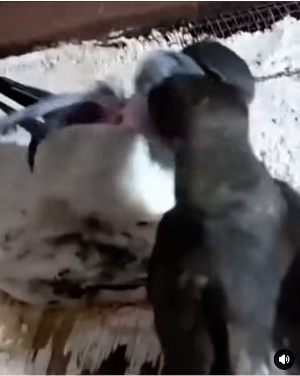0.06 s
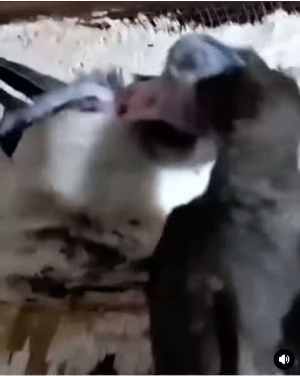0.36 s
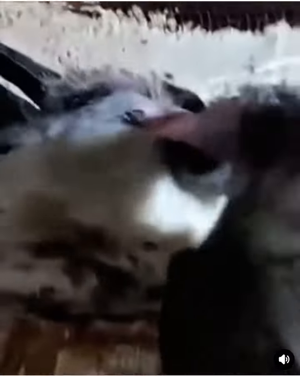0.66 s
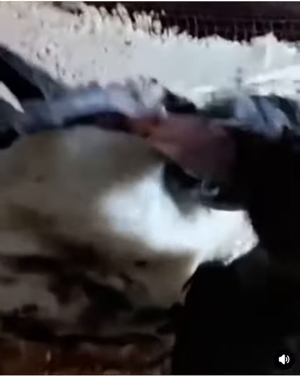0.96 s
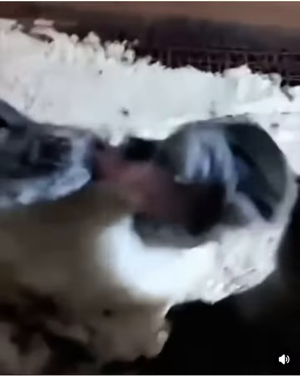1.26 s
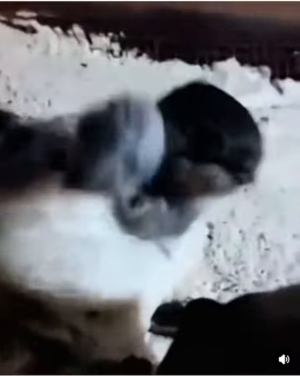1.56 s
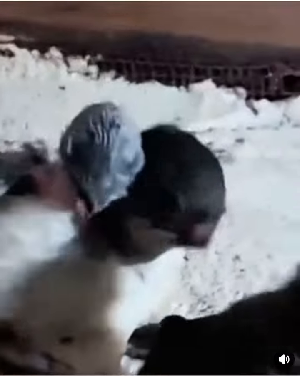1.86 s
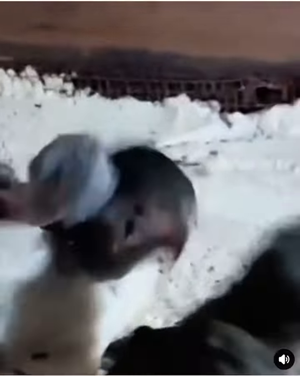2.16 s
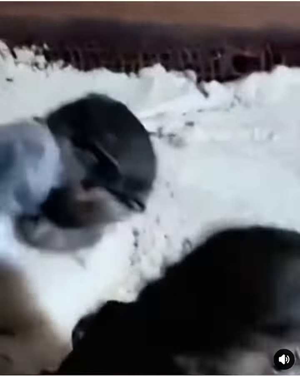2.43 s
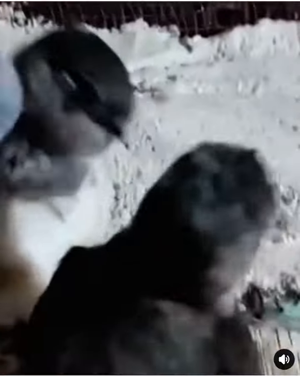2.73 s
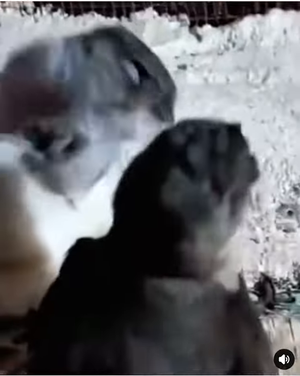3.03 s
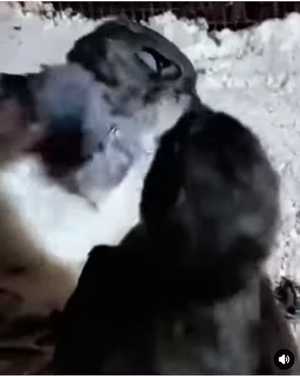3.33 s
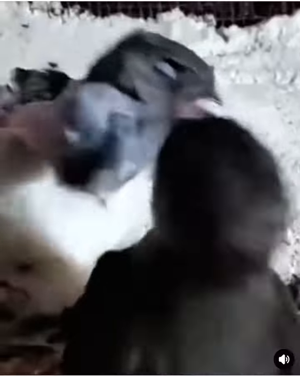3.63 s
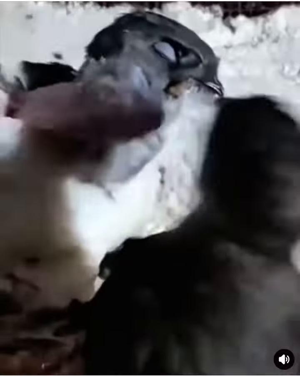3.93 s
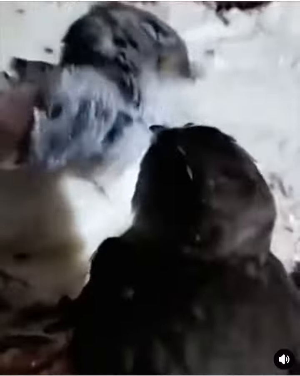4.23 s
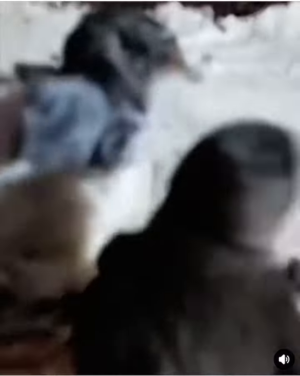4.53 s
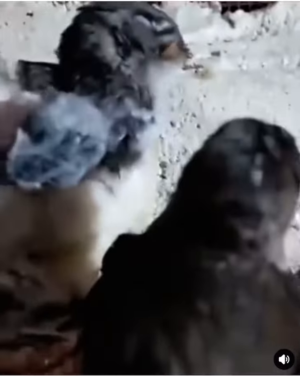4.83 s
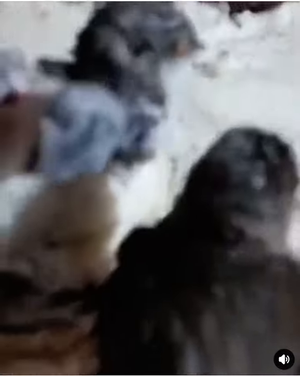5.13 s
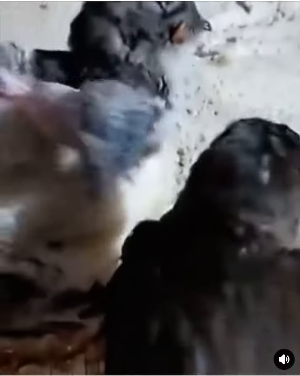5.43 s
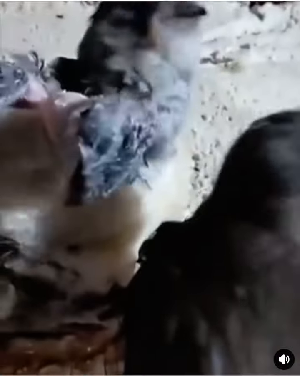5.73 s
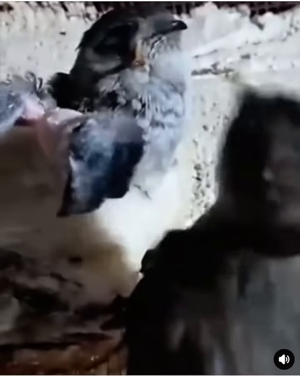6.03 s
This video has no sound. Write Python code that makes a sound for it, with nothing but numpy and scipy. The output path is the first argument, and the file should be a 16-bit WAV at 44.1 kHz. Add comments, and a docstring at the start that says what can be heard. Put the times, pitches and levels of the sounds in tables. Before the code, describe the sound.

Swiftlets click and twitter in a closed bird house while a nearby chick gives piercing begging calls, followed by squeaks and rattling trills.

```python
"""A swiftlet chick begs in a row of shrill, quavering calls, then breaks into squeaks and rattling trills.
Its voice comes from the syrinx, a bird's voice box, and is shrill and ringing.
Flying birds click to find their way by echo, and the colony twitters over a low rumble and hiss.
The closed bird house echoes, and the chick is so near a small microphone that it overloads it."""
import sys
import numpy as np
from scipy import signal
from scipy.fft import rfft, irfft
from scipy.io import wavfile

SR = 44100
rng = np.random.default_rng(int(sys.argv[2]) if len(sys.argv) > 2 else 0)


def digitize_waveform(pressure):
    """Quantize a signal to 16-bit integers and store it at the path in sys.argv[1].

    Rows of a 2-D input are taken as channels; values are limited to [-1, 1].
    """
    field = np.atleast_2d(pressure).T
    bounded = np.clip(field, -1, 1)
    quanta = np.round(bounded * 32767).astype(np.int16)
    wavfile.write(sys.argv[1], SR, quanta)


N = 276948
TREBLE_LIMIT_HZ = 15600


def amp(db):
    """Turns decibels into a factor to multiply by."""
    return 10 ** (np.asarray(db) / 20)


def unit(x):
    """Scales a signal to an average (rms) level of 1."""
    return x / np.sqrt(np.mean(x ** 2) + 1e-20)


def add(mix, start_s, sound):
    """Mixes a sound in at a given time."""
    part = mix[max(round(start_s * SR), 0):][:len(sound)]
    part += sound[:len(part)]


def shaped(x, tone):
    """Filters a signal with a tone curve of (f/Hz, level/dB) points."""
    hz, db = np.transpose(tone)
    bins_hz = np.fft.rfftfreq(len(x), 1 / SR)
    gain = amp(np.interp(np.log(bins_hz + 1), np.log(hz), db))
    return irfft(rfft(x) * gain, len(x))


def wander(size, hz):
    """A smooth random wobble, mostly slower than hz."""
    f = np.fft.rfftfreq(16384, 1 / SR)
    spectrum = rfft(rng.standard_normal(16384))
    return unit(irfft(spectrum / (1 + (f / hz) ** 4)))[:size]


def fade(t, rise_s, fall_s):
    """Fades a note in and out."""
    return np.clip(t / rise_s, 0, 1) * np.clip((t[-1] - t) / fall_s, 0, 1)


def reverb(x, ring_s):
    """A blur of echoes that dies away by 60 dB in ring_s."""
    t = np.arange(SR) / SR
    echoes = rng.standard_normal(SR) * amp(-60 * t / ring_s) * np.clip(t / 0.00025, 0, 1)
    return signal.fftconvolve(x, echoes / np.linalg.norm(echoes))[:N]


# Tone of the rumble and hiss: f/Hz, level/dB
NOISE_TONE = [(20, 7), (70, 10.5), (130, 13.5), (180, 10), (280, 7.5), (550, 2.5), (1100, 1), (3000, -1),
              (13600, 1), (14100, -40)]
# Hum of the power supply: f/Hz, level/dB
HUM = [(48.4, -50.5)]


def background(noise_db=-46):
    """Steady low rumble, hiss and a faint electric hum."""
    t = np.arange(N) / SR
    hum = sum(amp(db) * np.sqrt(2) * np.sin(2 * np.pi * hz * t) for hz, db in HUM)
    return amp(noise_db) * unit(shaped(rng.standard_normal(N), NOISE_TONE)) + hum


def chip(top_hz, end_hz, length_s, overtone_db=-8, droop_db=-3, jitter=0.051):
    """A tiny hoarse whistle that holds a high pitch, drops and holds again."""
    t = np.arange(0, length_s, 1 / SR)
    progress = t / length_s
    drop = np.clip((progress - .15) / .65, 0, 1)
    glide_hz = end_hz * (top_hz / end_hz) ** (np.cos(np.pi * drop / 2) ** 2)
    hz = glide_hz * (1 + jitter * wander(len(t), 1620))
    phase = 2 * np.pi * np.cumsum(hz) / SR
    whistle = np.sin(phase) + amp(overtone_db) * np.sin(2 * phase)
    return fade(t, .0004, .0008) * amp(droop_db * progress) * whistle


# Tone of the far birds: f/Hz, level/dB
TWITTER_TONE = [(1200, -25), (1700, 3), (2900, 0), (3400, 10.5), (4000, 11), (4600, 4), (5400, 13),
                (6300, 5), (7600, -4.5), (9000, -16), (15000, -45)]
# How the twitter swells and brightens: t/s, level/dB, treble tilt/dB per octave
TWITTER_SWELL = [(0, -33, 5.5), (.65, -34.5, 6.5), (.9, -37.5, 9.5), (2.2, -40, 9), (3.7, -36, 5),
                 (5.4, -36, 2.5), (6.04, -39.5, 4.5), (6.28, -28.5, 8.5)]


def colony(count=440, chip_s=0.00433, chips_db=-6):
    """Far birds chip at random; a wash of noise stands for the many calls that the room blurs."""
    chips = np.zeros(N)
    for when, pitch, size in rng.random((count, 3)):
        sound = chip(4500 + 3500 * pitch, 3200 + 1500 * pitch, chip_s)
        add(chips, when * N / SR, amp(9.3 * size) * sound)
    wash = unit(shaped(rng.standard_normal(N), TWITTER_TONE))
    chips = unit(shaped(chips + reverb(chips, 0.12), TWITTER_TONE))
    hz, t, spectra = signal.stft(unit(wash + amp(chips_db) * chips), SR, nperseg=512)
    times, db, tilt = np.transpose(TWITTER_SWELL)
    octaves = np.log2((hz[:, None] + 100) / 4700)
    gain = amp(np.interp(t, times, db) + np.interp(t, times, tilt) * octaves)
    return signal.istft(spectra * gain, SR, nperseg=512)[1][:N]


# Clicks of flying birds: t/s, relative level/dB, f/Hz, strength of a click just before/0-1
ECHO_CLICKS = [(0.0266, -21.5, 3320, 0.4), (.1398, -18, 3320, 0.5), (0.1756, -20.5, 5500, 0.2),
               (0.2207, -23.5, 4200, 0), (.247, -26, 5740, 0), (0.318, -17, 3670, 0.75),
               (.388, -18, 3530, 0.65), (0.4685, -17.5, 3660, 0.15), (.559, -16.5, 3620, 0.16),
               (0.5748, -23.5, 5500, 0.7), (.637, -22.5, 5900, 0.66), (0.6517, -22.5, 5000, 0.2),
               (0.7366, -18, 3760, 0.27), (.8001, -25.5, 4960, 0), (4.9094, -23, 4560, 0),
               (6.147, -25.5, 3550, 0.2), (6.248, -19, 4870, 0)]


def echo_clicks(gain_db=5.0, ring_db=-16, pair_gap_s=.0152):
    """Each click is a snap in the throat with a weaker low ring; many come as a weak-strong pair."""
    out = np.zeros(N)
    t = np.arange(0, .012, 1 / SR)
    swell = t / .0005 * np.exp(1 - t / .0005)
    ring = amp(ring_db) * np.exp(-t / .002) * np.sin(2 * np.pi * 1800 * t)
    for start, db, hz, lead in ECHO_CLICKS:
        falling_hz = hz * (1 + 1.86 * np.exp(-t / 0.00018))
        snap = swell * np.sin(2 * np.pi * np.cumsum(falling_hz) / SR)
        click = amp(db + gain_db) * (snap + ring)
        add(out, start - pair_gap_s, lead * click)
        add(out, start, click)
    return shaped(out, [(1000, -42), (1600, -2), (6500, 1.5), (9000, -12)])


# The voice's harmonics, at 1 to 5 times its pitch: level/dB
VOICE_HARMONICS = [-10, -8, -13.5, -11.5, -13]


def syrinx(hz, crack, rasp_db, overtone_db=0):
    """The voice box makes harmonics and a rasp of air; a crack adds tones halfway between harmonics."""
    phase = 2 * np.pi * np.cumsum(hz) / SR
    out = amp(rasp_db + overtone_db) * wander(len(hz), 2770) * np.sin(2 * phase)
    for k, db in enumerate(VOICE_HARMONICS, 1):
        level = amp(db + overtone_db * (k > 1))
        for multiple, share in ((k, 1), (k - .5, crack)):
            out += share * level * (multiple * hz < TREBLE_LIMIT_HZ) * np.sin(multiple * phase)
    return out


def shiver_phase(t, hz, unevenness):
    """Where the voice box is in its fast, slightly uneven shiver."""
    rate_hz = hz * (1 + unevenness * wander(len(t), 58.5))
    return 2 * np.pi * (rng.random() + np.cumsum(rate_hz) / SR)


# Squeaks: t/s, length/s, first f/Hz, last f/Hz, relative peak level/dB, place of the peak/0-1,
# level at the farther end/dB from the peak, flutter/0-1, overtone boost/dB
SQUEAK_NOTES = [(0.813, 0.022, 1904, 2860, -0.5, 0.76, -23, 0.26, -1),
                (3.286, 0.063, 2916, 2000, -9, 0.2, -19, 0.56, 0),
                (3.36, 0.041, 1984, 3730, -6.5, .95, -14, 0.86, 0.5),
                (4.106, 0.022, 3268, 1640, -0.5, 0.14, -11, 0.15, -22),
                (4.3182, .049, 3680, 1410, 1, .05, -19.5, 0.44, 1),
                (4.375, 0.04, 1886, 2160, -7, 0.9, -5.5, 0.1, -1),
                (4.416, .06, 2413, 3100, -4.5, 0.27, -9, 0.33, 2),
                (4.637, 0.016, 3056, 2030, 0, 0, -15, 0.11, -1),
                (4.882, 0.07, 5730, 5790, -20, 0.77, -15.5, 0.09, -20),
                (5.832, 0.022, 2692, 1770, -5, 0.38, -13, 0.7, -2.5),
                (6.205, .045, 2580, 2700, -35, .4, -14, 0.26, 4),
                (6.27, 0.01, 1820, 2100, -9, 0.25, -11.5, 0.42, -5)]
# Tone of the squeaks as heard: f/Hz, level/dB
SQUEAK_TONE = [(1200, -11), (1750, -9.5), (2400, -6), (2950, -7.5), (3350, -6.5), (3900, -5), (4500, -6.5),
               (5100, -2.5), (5800, -1), (6500, -8), (7400, -3), (8300, -17.5), (9500, -20.5), (14000, -32)]


def squeaks(depth=0.21, jitter=0.081, throb_db=5, gain_db=-2, rasp_db=-16, shimmer_db=3):
    """Notes that glide up or down and swell to one peak, clean or broken by a flutter."""
    out = np.zeros(N)
    for start, length, first_hz, last_hz, db, peak, fall_db, flutter, overtone_db in SQUEAK_NOTES:
        t = np.arange(0, length, 1 / SR)
        progress = t / length
        shiver = shiver_phase(t, hz=166.5, unevenness=0.144)
        wobble = depth * np.sin(shiver) + jitter * wander(len(t), 1220)
        hz = first_hz * (last_hz / first_hz) ** progress * (1 + flutter * wobble)
        swell_db = fall_db * abs(progress - peak) / max(peak, 1 - peak)
        flicker_db = throb_db * flutter * np.cos(shiver) + shimmer_db * wander(len(t), 380)
        level = amp(gain_db + db + swell_db + flicker_db) * fade(t, 0.0013, 0.0014)
        add(out, start, level * syrinx(hz, 0.055 * flutter, rasp_db, overtone_db))
    return shaped(out, SQUEAK_TONE)


# Begging calls: t/s, length/s, dip f/Hz, final f/Hz, strain/0-1
BEGGING_CALLS = [(0.903, .057, 2840, 3180, 0.3), (1.046, 0.087, 2656, 3520, 0),
                 (1.238, .11, 2671, 3560, 0.37), (1.467, .12, 2658, 3520, 0.3),
                 (1.698, 0.12, 2765, 3434, 0.74), (1.96, 0.11, 2547, 3486, 0.43),
                 (2.191, 0.11, 2656, 3494, 0.3), (2.4193, .12, 2725, 3430, .7),
                 (2.672, 0.13, 2823, 3298, 1), (2.938, .14, 2864, 3346, 0.73),
                 (3.222, 0.062, 3218, 3128, 0.35)]
# Five stages of a call: share of its length/0-1
CALL_STAGES = [0, .27, .6, .8, 1]
# Swell at those stages: level/dB
CALL_SWELL = [0, -4, -2, 1.2, -1.3]
# An easy and a fully strained call: share of the climb made early/0-1
EARLY_CLIMB = (0.1184, .95)
# An easy and a fully strained call: level/dB
STRAIN_LEVEL = (-2.5, 0)
# Tone of the begging calls as heard: f/Hz, level/dB
BEGGING_TONE = [(1700, -4), (2100, -9.5), (2600, -2), (3000, -15.5), (3330, -3), (3900, -18), (4550, -15.5),
                (5100, 4.5), (5600, -5), (6300, 0.5), (7100, 3), (8200, -8.5), (10000, -19), (14000, -24)]


def begging(depth=0.063, jitter=0.023, throb_db=1.5, shimmer_db=2.5):
    """Quavering calls dip and mostly climb again; strain makes them louder, climb sooner and crack."""
    out = np.zeros(N)
    for start, length, dip_hz, final_hz, strain in BEGGING_CALLS:
        t = np.arange(0, length, 1 / SR)
        progress = t / length
        shiver = np.sin(shiver_phase(t, hz=178.6, unevenness=.06))
        looseness = np.interp(progress, CALL_STAGES, [0.34, 2.05, 1.36, 0.39, 0.49])
        climb_hz = dip_hz + (final_hz - dip_hz) * np.interp(strain, [0, 1], EARLY_CLIMB)
        hz = np.interp(progress, CALL_STAGES, [1.11 * dip_hz, dip_hz, climb_hz, final_hz, final_hz])
        hz *= 1 + looseness * (depth * shiver + jitter * wander(len(t), 1350))
        db = np.interp(strain, [0, 1], STRAIN_LEVEL) + np.interp(progress, CALL_STAGES, CALL_SWELL)
        flicker_db = throb_db * looseness * shiver + shimmer_db * wander(len(t), 230)
        # The voice cracks an octave down, mainly at the two ends of a call.
        first_crack = strain * np.exp(-((t - .012) / 0.013) ** 2)
        last_crack = 0.44 * np.exp(-((length - t) / 0.0044) ** 2)
        crack = first_crack + last_crack + 0.1 * wander(len(t), 890)
        level = amp(db + flicker_db) * fade(t, 0.0024, 0.001)
        add(out, start, level * syrinx(hz, crack, rasp_db=-14.0))
    return shaped(out, [(900, -114)] + BEGGING_TONE)


RATTLE = 66.2  # chips per second in the long, steady last trill
# Trills: t/s, length/s, first and last rate/chips per s, a chip's top and end f/Hz,
# relative level/dB, level change/dB, final sag of a chip's top and end/octaves
TRILL_RUNS = [(3.4441, 0.0454, 160, 140, 6910, 3590, 1, -4, 0.1, .08),
              (3.5185, 0.0103, 140, 130, 7500, 4180, -4, -5, 0.42, 0.37),
              (3.578, 0.016, 135, 127.9, 5100, 3650, -3.5, 4.5, 0.63, 0.29),
              (3.782, 0.02, 148, 165, 4170, 3135, 3.5, -5, 0.017, .02),
              (3.811, .059, 145, 130, 7210, 3310, 2.5, -9.5, 0.17, .1),
              (3.8913, .207, 111, 66, 7540, 3710, -4.5, 0.5, 1.4, 0.11),
              (4.5096, 0.12, 107, 72, 6890, 3470, -2.5, -7, 0.24, .12),
              (4.9598, 0.34, RATTLE, RATTLE, 7193, 3468, -1.5, -7.5, 1.82, 0.96)]
# Tone of the trills as heard: f/Hz, level/dB
TRILL_TONE = [(1200, -25), (1750, -15), (2400, -8.5), (2950, -11), (3350, -5), (3900, -14.5), (4500, -10),
              (5100, -6.5), (5800, -6), (6500, -4), (7500, -10.5), (8300, -14.5), (9300, -23.5),
              (14000, -25)]


def trills(rasp=0.49, gain_db=-0.07, sag_s=.048, sag_db_per_octave=-3):
    """Quick runs of chips whose pitch sags as the run ends; louder chips last longer."""
    out = np.zeros(N)
    for start, span, first, last, top_hz, end_hz, level_db, change_db, top_sag, end_sag in TRILL_RUNS:
        t = 0
        while t < span:
            rate = first + (last - first) * (t / span) ** 0.65  # changes fastest early on
            sag = np.expm1(t / sag_s) / np.expm1(span / sag_s)
            db = level_db + change_db * t / span + sag_db_per_octave * top_sag * sag
            stray_pitch, stray_db = rng.standard_normal(2)
            length = .52 / rate * np.clip(1.1 + .025 * db, .8, 1.2)  # about half chip, half gap
            low_hz = end_hz / 2 ** (end_sag * sag)
            high_hz = top_hz * (1 + .025 * stray_pitch) / 2 ** (top_sag * sag)
            sound = chip(max(high_hz, low_hz), low_hz, length)
            roughness = 1 + rasp * wander(len(sound), 1440)
            add(out, start + t, amp(gain_db + db + stray_db) * sound * roughness)
            t += 1 / rate
    return shaped(out, TRILL_TONE)


# Echoes off the wall and beam by the nest: delay/s, relative level/dB
WALL_ECHOES = [(.0011, -20), (.0027, -10), (.0046, -7.5), (.0071, -17)]
# Tone of the room's long ring: f/Hz, level/dB
ROOM_TONE = [(2500, -1), (3050, -16), (3380, 2), (3850, 2), (4600, -9), (5500, -2.5), (7000, -4.5),
             (9000, -2)]


def house(x, wall_db, corner_db, room_db):
    """Adds single echoes off wall and beam, the corner's short ring and the room's long one."""
    echoes = np.zeros(N)
    for delay, db in WALL_ECHOES:
        add(echoes, delay, amp(db + wall_db) * x)
    corner = amp(corner_db) * reverb(x, ring_s=0.04)
    room = amp(room_db) * shaped(reverb(x, ring_s=1.0), ROOM_TONE)
    return x + echoes + corner + room


def scene():
    """Mixes the near birds and their echoes with the colony and background, in one channel."""
    calling = house(begging(), wall_db=-3.5, corner_db=-2.5, room_db=-20.0)
    squeaking = house(squeaks(), wall_db=-23, corner_db=3.5, room_db=-17)
    trilling = house(trills(), wall_db=1.0, corner_db=-1, room_db=-12.5)
    clicking = house(echo_clicks(), wall_db=-34, corner_db=-5, room_db=-46)
    return (calling + squeaking + trilling + clicking + colony() + background())[None]


def record(dry, offset=0.064, ceiling=0.43, hardness=5):
    """The microphone's input sits off centre and flattens loud calls; then the top treble is cut."""
    fine = signal.resample_poly(dry, 4, 1, axis=1) + offset  # 4 times the samples avoids false tones
    flattened = fine / (1 + abs(fine / ceiling) ** hardness) ** (1 / hardness)
    low_pass = signal.firwin(1201, TREBLE_LIMIT_HZ, window=("kaiser", 9), fs=4 * SR)
    return signal.oaconvolve(flattened, low_pass[None], "same")[:, ::4]


dry = scene()
out = record(dry)
digitize_waveform(out)
```